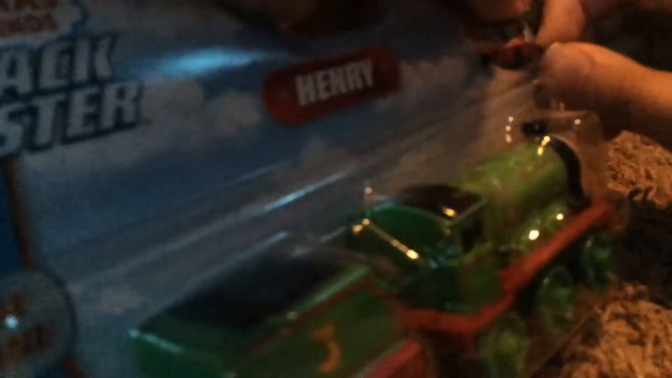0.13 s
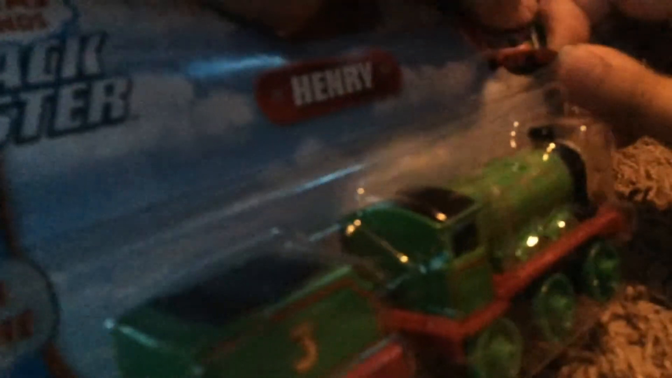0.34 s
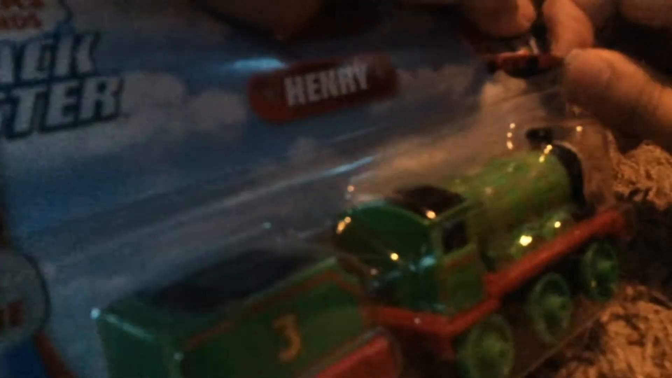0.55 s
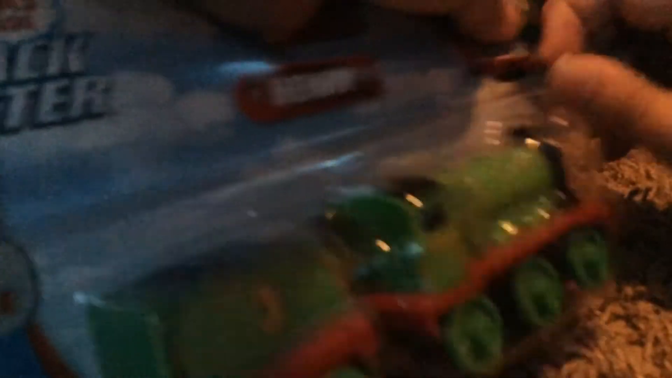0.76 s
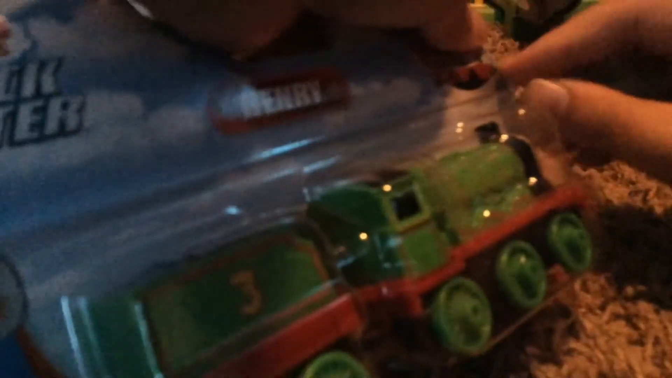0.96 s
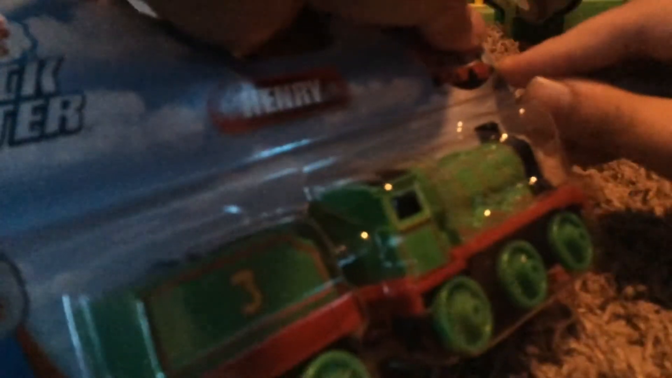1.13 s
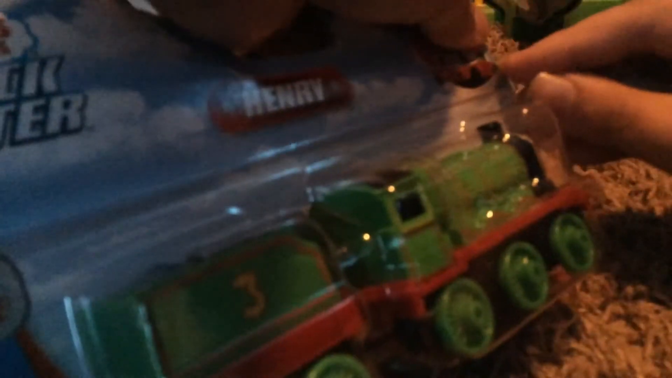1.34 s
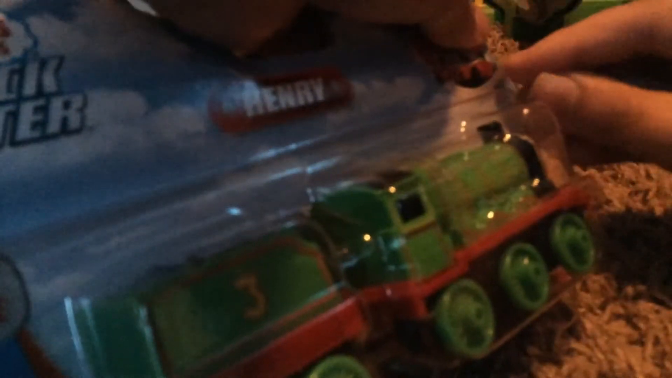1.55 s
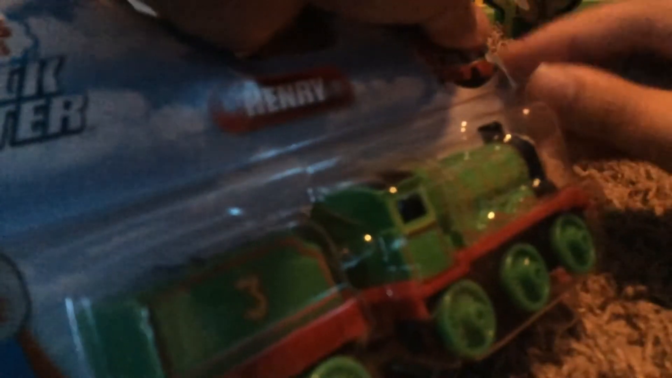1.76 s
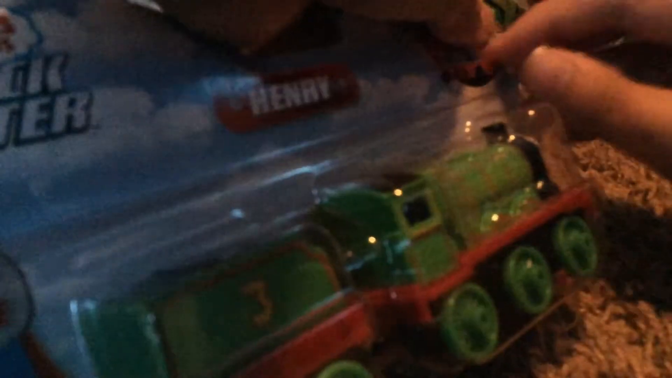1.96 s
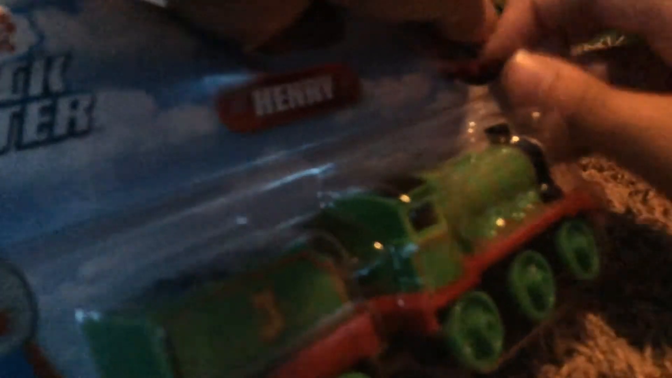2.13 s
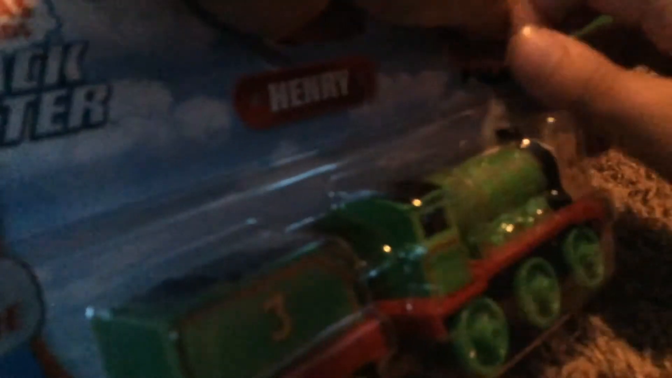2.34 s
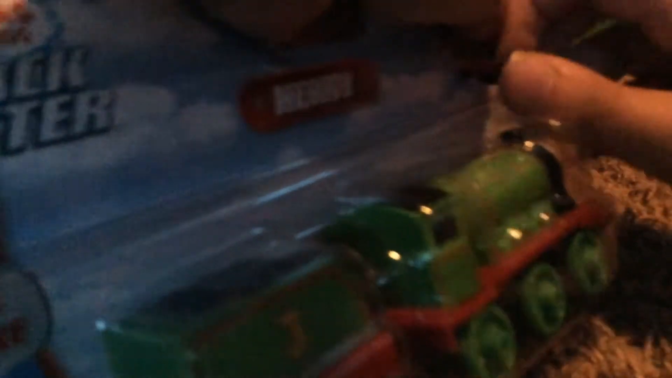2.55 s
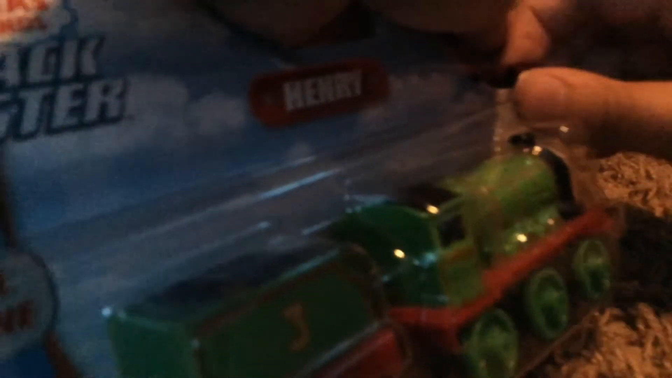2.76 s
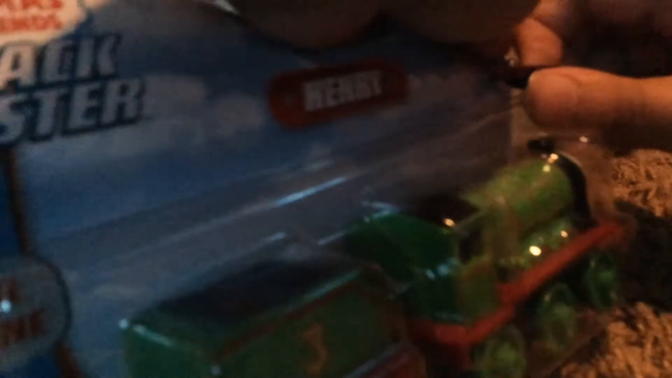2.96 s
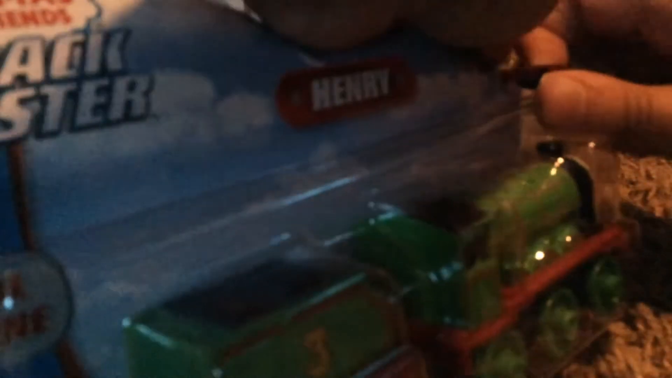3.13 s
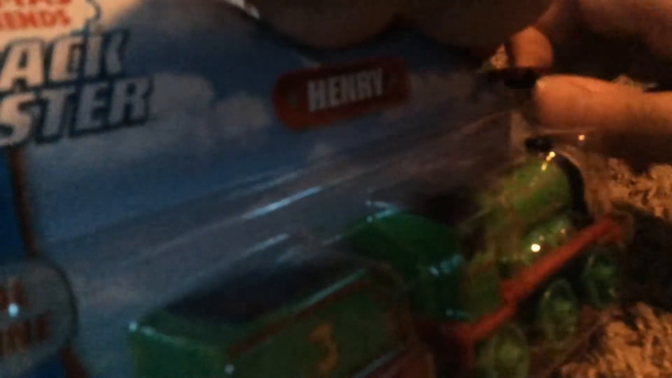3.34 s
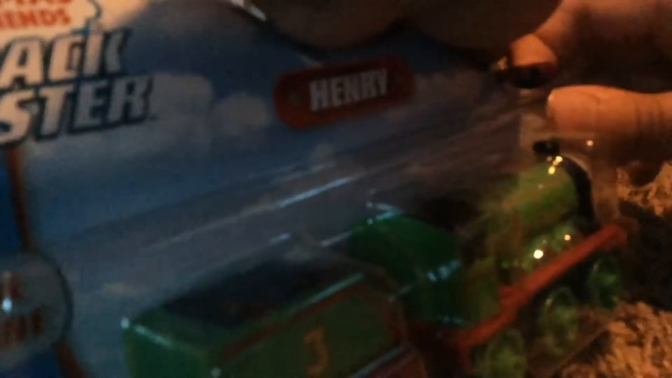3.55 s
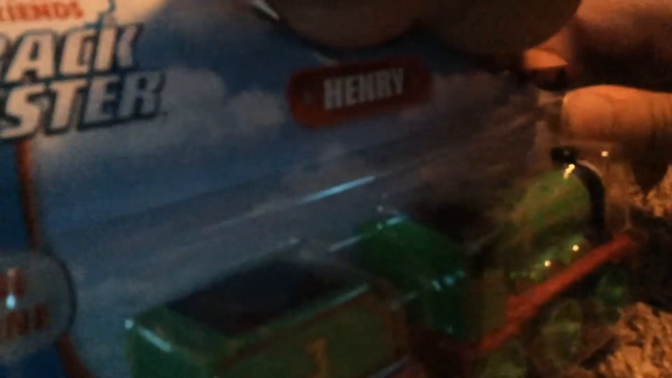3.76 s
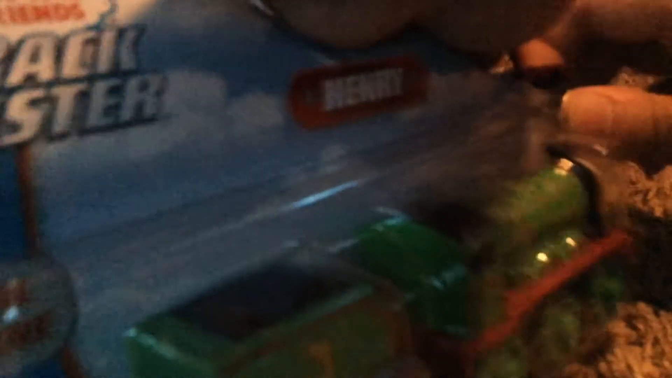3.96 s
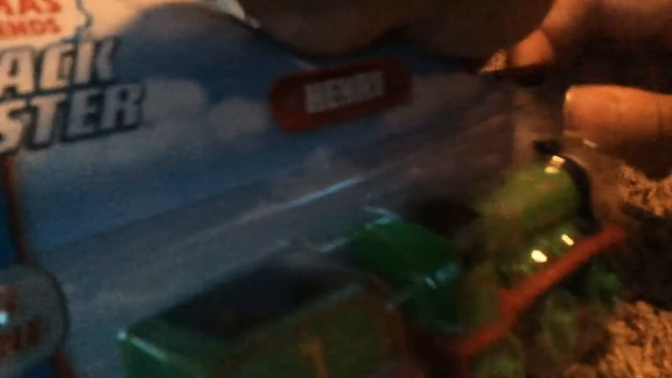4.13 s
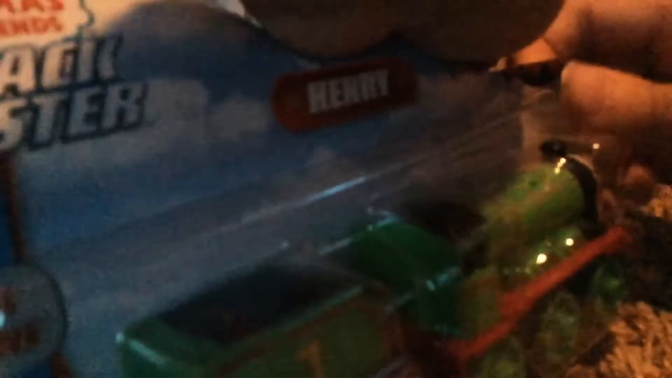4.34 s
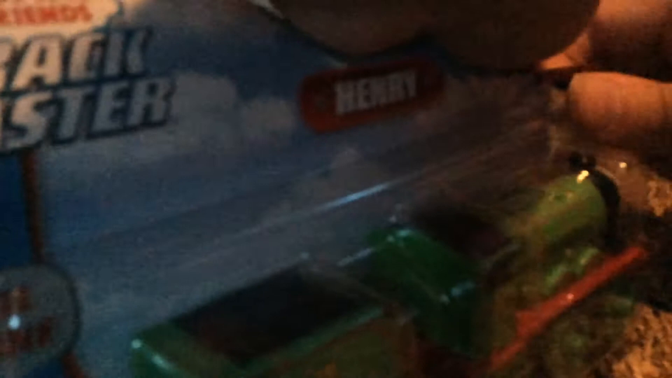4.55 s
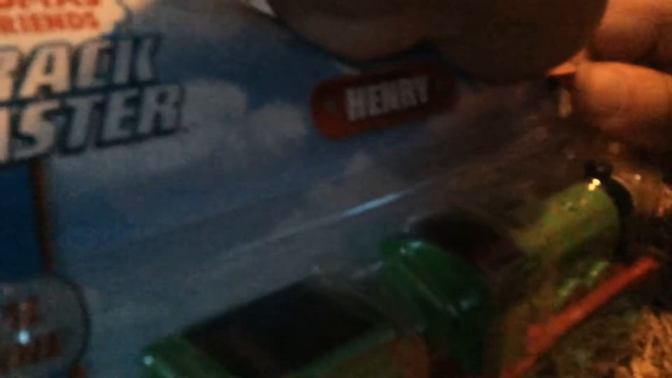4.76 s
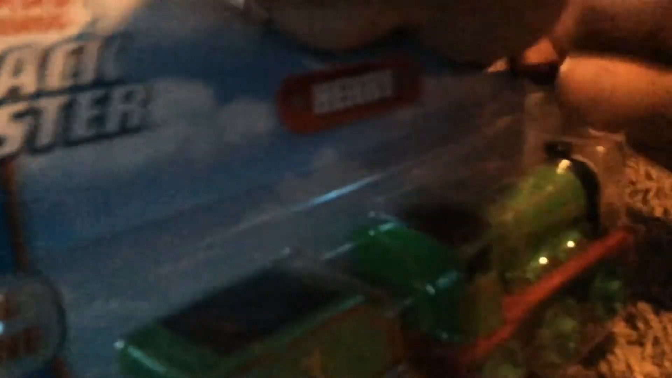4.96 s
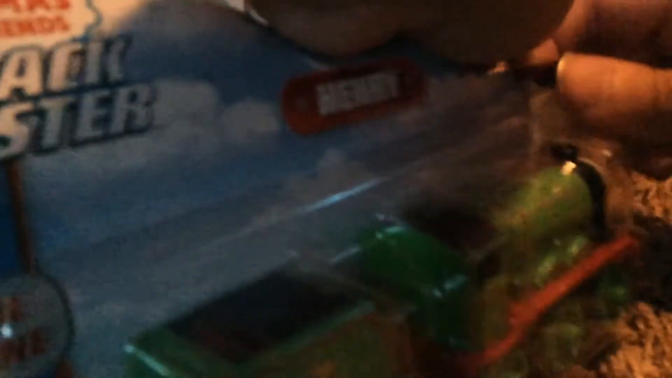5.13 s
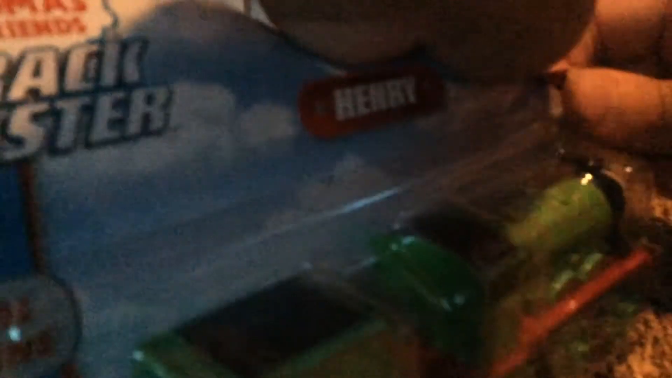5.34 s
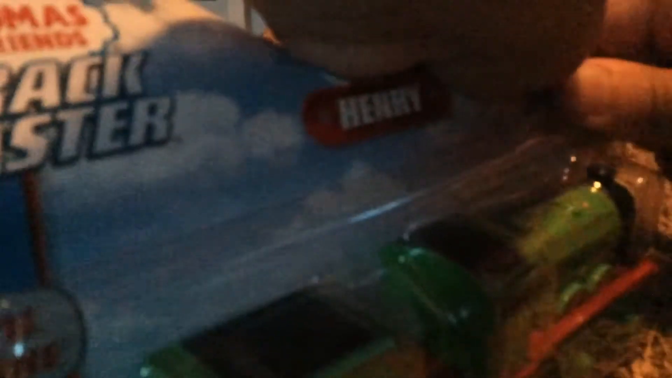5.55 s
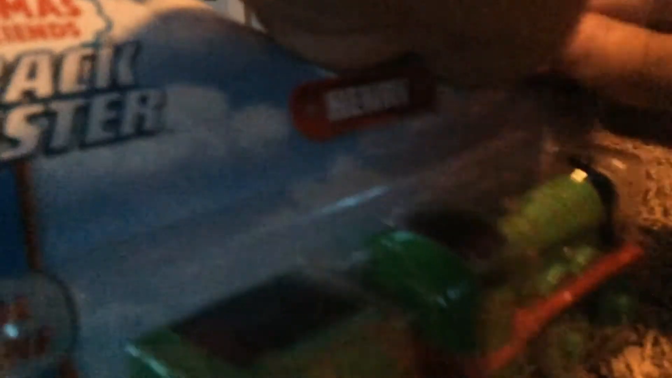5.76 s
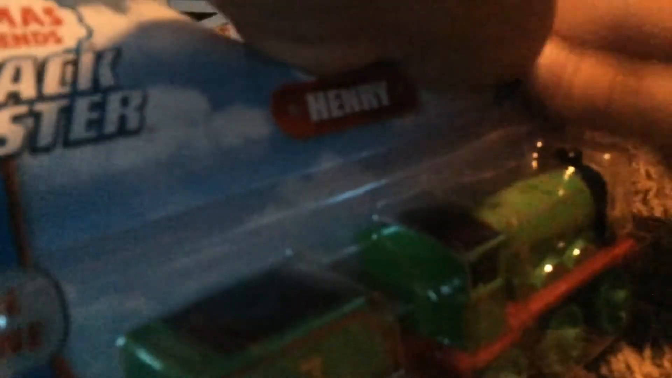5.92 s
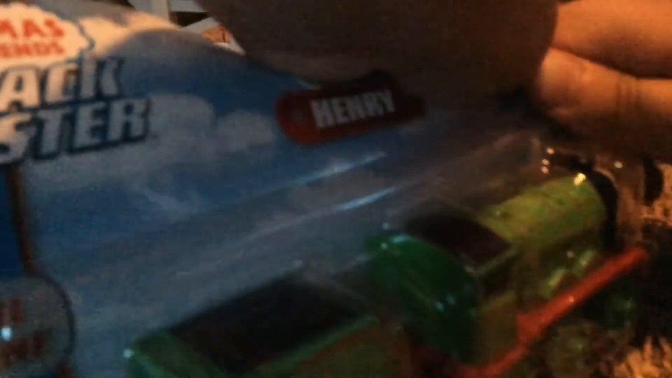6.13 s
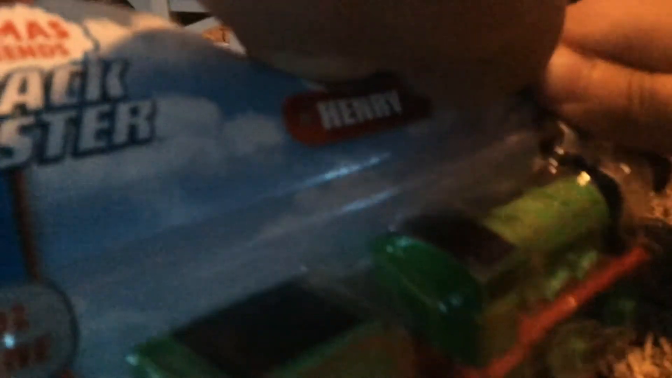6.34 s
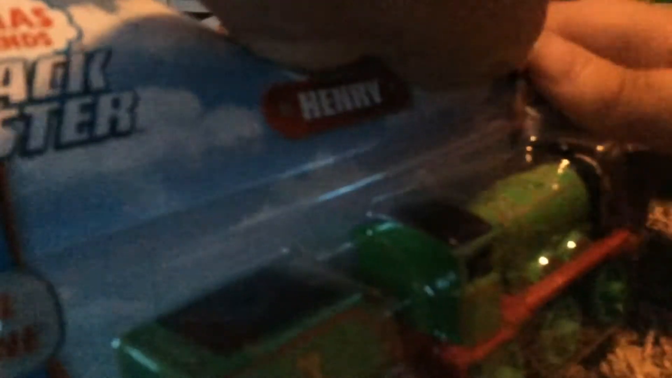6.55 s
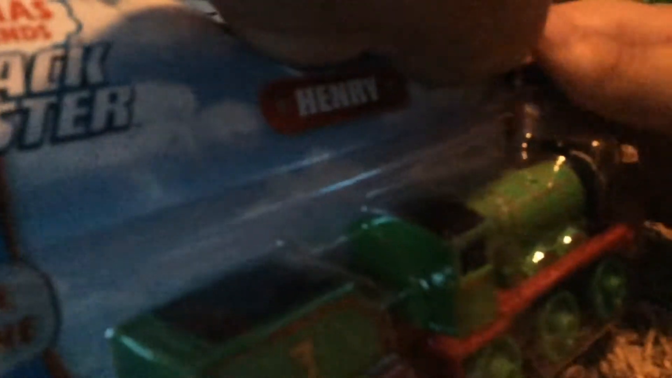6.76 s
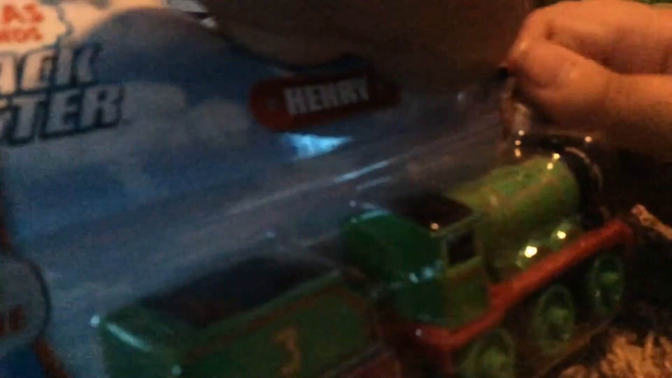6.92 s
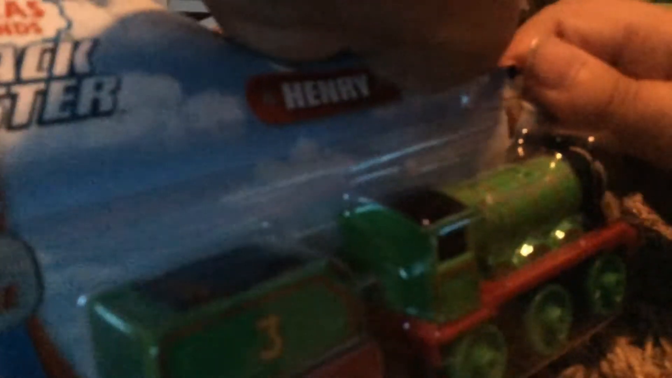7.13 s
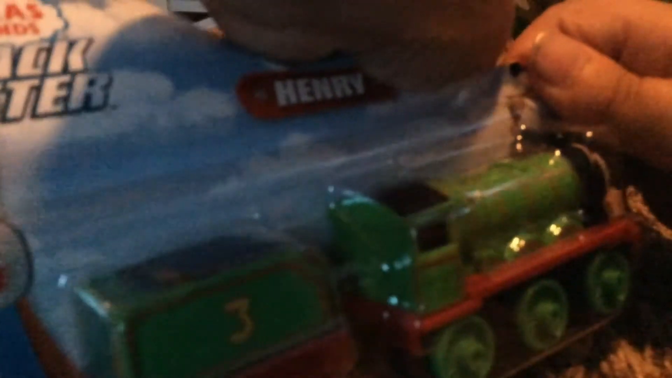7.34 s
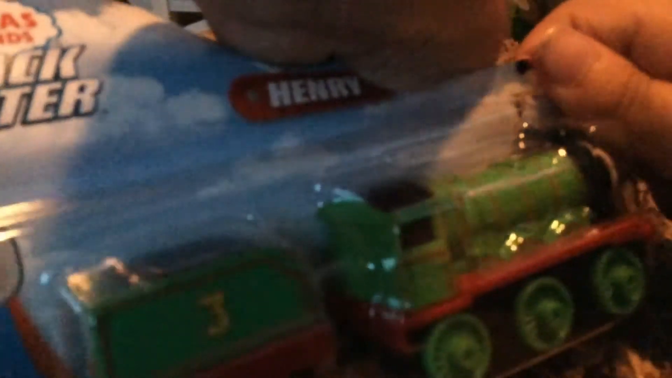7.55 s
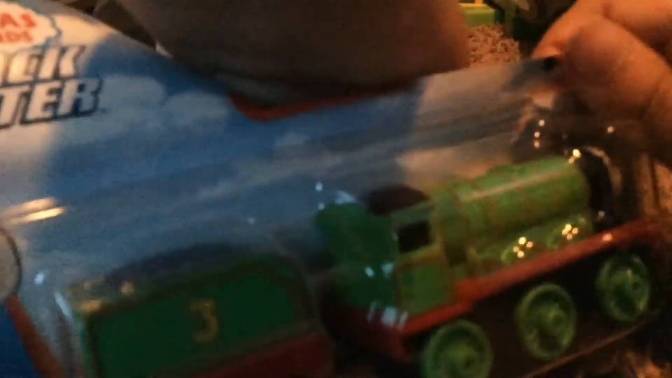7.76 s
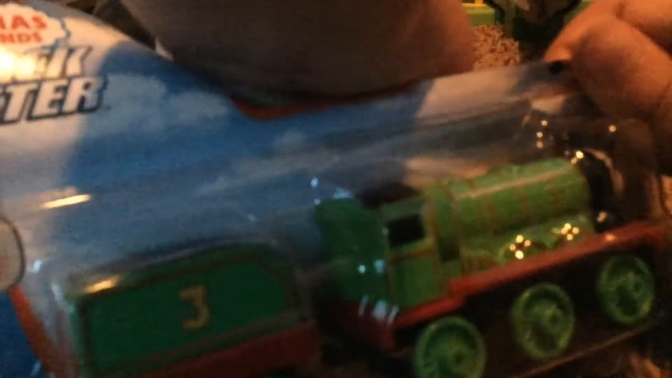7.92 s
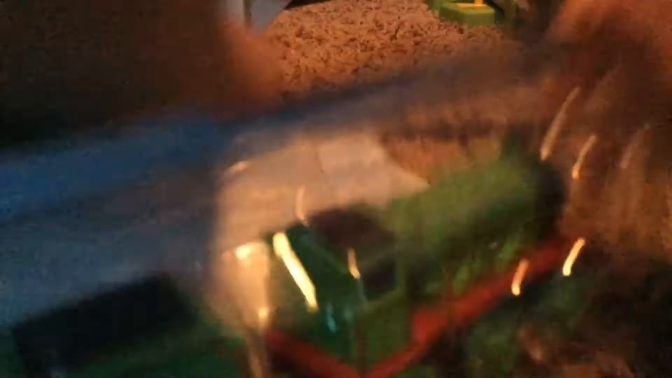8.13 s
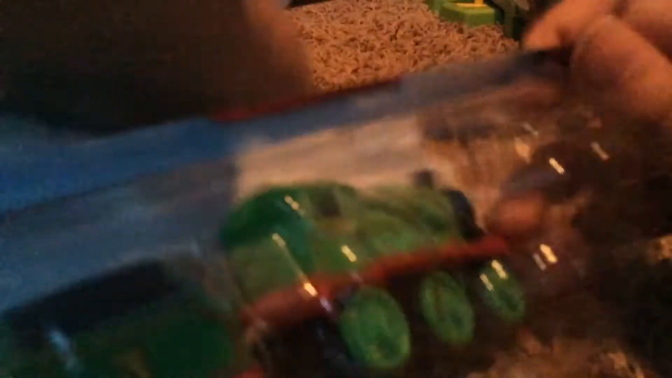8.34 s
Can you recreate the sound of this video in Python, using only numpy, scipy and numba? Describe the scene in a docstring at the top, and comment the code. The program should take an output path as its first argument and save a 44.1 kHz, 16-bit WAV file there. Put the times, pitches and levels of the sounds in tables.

```python
"""Fingers pry a clear plastic blister off its card, close by in a small carpeted room.
The sheet buckles in snaps: filtered noise bursts make the crack, decaying sines the ringing hollow shell.
Uneven runs of small cracks make creaks; filtered noise and random clicks make the hiss under each stroke.
Sines gliding in pitch squeak once, and near the end dense random clicks make the glued seam rip twice.
Under it all lies a quiet, low background of filtered noise."""
import sys
import numpy as np
from scipy import signal
from scipy.fft import rfft, irfft
from scipy.io import wavfile
from scipy.ndimage import uniform_filter1d
from numba import njit

SR = 44100
rng = np.random.default_rng(int(sys.argv[2]) if len(sys.argv) > 2 else 0)


def master_out(mix):
    """Clip the mix to full scale and print it as 16-bit PCM to the path in sys.argv[1]."""
    frames = np.transpose(np.atleast_2d(mix))
    ceiling = np.clip(frames, -1, 1)
    pcm = np.round(ceiling * 32767).astype(np.int16)
    wavfile.write(sys.argv[1], SR, pcm)


N = 369999
TIME = np.arange(N) / SR
RING = np.arange(2700) / SR  # time within one short blow [s]
BLOW_SAMPLES = SR / 100  # blow levels are rms over 10 ms

# ways the hollow shell rings, before the grip retunes them:
# (frequency [Hz], relative level [dB], time to fall 60 dB [s])
SHELL_MODES = [(422, -3, 0.031), (458, -9, 0.093), (508.5, 1.5, 0.057), (573.4, 3, 0.038),
               (617, -1.5, 0.049), (696, 0, 0.058), (759, 4, 0.026), (817.6, 0, 0.06), (1033, -8, 0.055),
               (1172, -8.5, .05), (1252, -11, 0.065), (1360, -2.5, 0.031)]
# ways the whole packet flexes, before the grip retunes them:
# (frequency [Hz], relative level [dB], time to fall 60 dB [s])
PACKET_MODES = [(58, -22.5, .09), (108, -9.5, 0.1), (136, -11.5, 0.051), (176, -13.5, 0.095),
                (232.5, -2, 0.035), (273, -7.5, 0.05), (342, 0.5, 0.056), (374, 1, 0.038)]
# spectrum of a cracking sheet: (frequency [Hz], relative level [dB])
CRACK_SPECTRUM = [(500, -24.5), (1100, 4), (1550, 8), (1900, 2), (2600, -2.5), (3300, 1), (5000, -2.5),
                  (6000, -4), (7500, -23), (12000, -48)]
# spectrum of a sharp, high tick: (frequency [Hz], relative level [dB])
TICK_SPECTRUM = [(2500, -36.5), (5000, -18.5), (6300, -2), (8500, 2), (11500, -0.5), (13500, -3),
                 (16000, -18.5)]
# a finger or the card slides over the plastic; levels are those halfway through the stroke:
# (start [s], end [s], scrape [dB], hiss [dB], shell [dB], swell from start to end [dB])
STROKES = [(0.018, 0.346, -61, -62.5, -58, 0.5), (0.403, 0.512, -61, -61.5, -61.5, 6),
           (0.66, 0.738, -77, -72.5, -74, -15), (0.795, 0.861, -65.5, -70, -58.5, 4),
           (0.973, 1.031, -70, -76, -66, 5), (1.404, 1.416, -68, -72, -62, -10),
           (1.822, 1.868, -68, -69, -57, -1), (1.998, 2.218, -69.5, -73.5, -64, 5.5),
           (2.509, 2.638, -66, -69, -58.5, -4), (2.721, 2.867, -70.5, -67, -70, 3),
           (2.897, 3, -58.5, -58.5, -60, 0), (3.029, 3.075, -53.5, -47, -43.5, 6),
           (3.153, 3.396, -69, -63.5, -61.5, -3), (3.476, 3.57, -60, -58, -53.5, -1.5),
           (3.593, 3.786, -63, -59, -60.5, 22.5), (3.891, 3.967, -55.5, -59.5, -60.5, 6),
           (4.047, 4.062, -45, -51, -44.5, 7), (4.204, 4.263, -48.5, -65, -45, -14),
           (4.332, 4.379, -70, -65, -56, 1), (4.458, 4.7, -64.5, -60, -53.5, 3),
           (4.691, 4.836, -70, -62, -67, 8), (4.91, 5.042, -61.5, -65, -59, 18.5),
           (5.114, 5.231, -56, -63, -46.5, -1.5), (5.307, 5.633, -61.5, -55.5, -57, 11.5),
           (5.677, 5.881, -58, -63.5, -53.5, 4.5), (5.939, 5.992, -44.5, -46.5, -36.5, -3.5),
           (6.048, 6.255, -55, -50, -59.5, 11.5), (6.324, 6.484, -47.5, -56.5, -46.5, -11),
           (6.538, 6.744, -67.5, -73, -67, -4), (6.896, 7.051, -66, -67.5, -61.5, -5),
           (7.09, 7.12, -45, -48.5, -48, -4), (7.156, 7.245, -65, -60.5, -63, 10),
           (7.283, 7.373, -54.5, -59, -54, -11.5), (7.378, 7.668, -53, -54, -53, 19),
           (7.849, 8.042, -50, -50.5, -56, 15), (8.141, 8.212, -41.5, -54, -51, -8),
           (8.348, 8.39, -45.5, -54, -54, 17)]


def undb(db):
    """Turn decibels into gain."""
    return 10 ** (np.asarray(db) / 20)


def unit(x):
    """Scale to rms 1."""
    return x / np.sqrt(np.mean(x ** 2) + 1e-18)


def blow(x, db):
    """Scale a short sound to the energy of 10 ms at this level."""
    return x * undb(db) * np.sqrt(BLOW_SAMPLES / (np.sum(x ** 2) + 1e-18))


def gains(rows):
    """Make one gain curve for each dB column of a table, silent outside its span."""
    s, *columns = np.transpose(rows)
    inside = (TIME >= s[0]) * (TIME <= s[-1])
    return [undb(np.interp(TIME, s, column)) * inside for column in columns]


def add(out, s, x):
    """Mix x into out at time s."""
    i = max(int(s * SR), 0)
    out[i:i + len(x)] += x[:max(N - i, 0)]


def through(x, response):
    """Pass x through an impulse response."""
    return signal.oaconvolve(x, response)[:len(x)]


def colour(points, size=512):
    """Make an impulse response with the given spectrum that starts at once (minimum phase)."""
    hz, db = np.transpose(points)
    f = np.maximum(np.arange(size // 2 + 1) * SR / size, 1)
    level_db = np.interp(np.log(f), np.log(hz), db)
    cepstrum = irfft(np.log(undb(level_db)))
    # fold the second half onto the first, so that nothing sounds before time zero
    cepstrum[1:size // 2] *= 2
    cepstrum[size // 2 + 1:] = 0
    return irfft(np.exp(rfft(cepstrum)))


def fade(t, t60):
    """Die away exponentially, by 60 dB in t60 seconds."""
    return np.exp(-np.log(1000) * t / t60)


@njit
def resonate(x, hz, q):
    """State-variable band-pass whose centre may move every sample."""
    y, band, low = np.empty(len(x)), 0., 0.
    for i in range(len(x)):
        g = np.tan(np.pi * min(hz[i] / SR, .45))
        v = (band + g * (x[i] - low)) / (1 + g * (g + 1 / q))
        band, low, y[i] = 2 * v - band, low + 2 * g * v, v / q
    return y


def facet(x, hz, q):
    """The small patch of plastic that flips lends a click its pitch."""
    return resonate(x, np.full(len(x), float(hz)), float(q))


def soften(x, hz):
    """Soft flesh pushes slowly, so the higher modes stay quiet."""
    return unit(signal.sosfilt(signal.butter(2, hz, fs=SR, output="sos"), x))


def unsteady(spread_db, size=600):
    """Gain of a grip that tightens and eases many times a second."""
    drift = uniform_filter1d(rng.standard_normal(N), size)
    drift = uniform_filter1d(drift, size)
    return unit(undb(spread_db * unit(drift)))


def ring(modes, detune, scatter_db):
    """One blow on a set of modes; the grip retunes them and the place of the blow weights them."""
    hz, db, t60 = np.transpose(modes)[:, :, None]
    tune, weight, side = rng.standard_normal((3, len(modes), 1))
    waves = np.sin(2 * np.pi * hz * (1 + detune * tune) * RING) * fade(RING, t60)
    motion = np.sum(np.sign(side) * undb(db + scatter_db * weight) * waves / hz, axis=0)
    return np.gradient(motion)  # a small shell radiates no steady pressure


def knock(modes, first_pass=0.36, spread_t60=0.061, rise=0.00024):
    """The first bending wave is the strongest; it arrives softly and then spreads over the shell."""
    strength = 1 + first_pass * fade(RING, spread_t60)
    onset = 1 - np.exp(-RING / rise)
    return ring(modes, detune=0.029, scatter_db=2.5) * strength * onset


def burst(front_t60, scatter_t60, scatter_db, rise=0.00072):
    """Noise with a sharp front, then bending waves that scatter about the sheet."""
    decay = fade(RING, front_t60) + undb(scatter_db) * fade(RING, scatter_t60)
    onset = 1 - np.exp(-RING / rise)
    return rng.standard_normal(len(RING)) * decay * onset


def grains(rate, spread_db):
    """Tiny slips at random moments; a positive spread makes a few much larger than the rest."""
    chance, out = rng.random(N), np.zeros(N)
    at = np.flatnonzero(chance < rate / SR)
    rarity = np.minimum(-np.log(chance[at] * SR / rate + 1e-18), 4)  # exponentially distributed
    out[at] = undb(spread_db * rarity) * (-1.) ** at
    return unit(out)


def rumble(modes, rate, spread_db, count=3):
    """A set of modes kept ringing by slips at several places."""
    total = np.zeros(N)
    for _ in range(count):
        total += through(grains(rate, spread_db), unit(ring(modes, detune=0.017, scatter_db=-0.5)))
    return unit(total)


def room_tone(level_db=-63):
    """A quiet, mostly low background made of steady filtered noise."""
    # (frequency [Hz], relative level [dB])
    tone_spectrum = [(20, -23.5), (45, -4.5), (70, -3), (120, -2.5), (200, -13), (400, -23), (800, -30),
                     (2000, -33.5), (5000, -37), (10000, -35), (13000, -38.5), (16000, -59.5)]
    return undb(level_db) * unit(through(rng.standard_normal(N), colour(tone_spectrum, size=4096)))


def room(x, wet_db=-13, build_s=0.0008, t60_s=.38):
    """The room returns a faint, bright tail."""
    # spectrum of the tail: (frequency [Hz], relative level [dB])
    echo_spectrum = [(60, -3.5), (200, 3.5), (600, -2), (1500, 0), (4000, -2), (9000, 0), (16000, 7)]
    t = TIME[:SR // 2]
    build_up = 1 - np.exp(-(t / build_s) ** 2)
    tail = through(rng.standard_normal(len(t)) * fade(t, t60_s) * build_up, colour(echo_spectrum))
    return x + undb(wet_db) * through(x, tail / np.sqrt(np.sum(tail ** 2)))


def bump(soft_hz=150):
    """A hand bumps the card softly, which moves only the lowest modes of the packet."""
    # (time [s], level [dB])
    bump_curve = [(2.33, -54), (2.352, -46.5), (2.39, -44.5), (2.42, -57), (2.5, -58)]
    return gains(bump_curve)[0] * soften(rumble(PACKET_MODES, rate=240, spread_db=-2), soft_hz)


def stroke_gains(press_db_per_s=478.5, lift_db_per_s=423):
    """Scrape, hiss and shell gains: each stroke takes hold, swells or eases steadily, and lets go."""
    out = np.zeros((3, N))
    for start, end, scrape, hiss, shell, swell in STROKES:
        near = slice(max(int((start - .1) * SR), 0), int((end + .1) * SR))
        t = TIME[near]
        shape = swell * (np.interp(t, [start, end], [0, 1]) - .5)
        shape -= press_db_per_s * np.maximum(start - t, 0)
        shape -= lift_db_per_s * np.maximum(t - end, 0)
        stroke = undb(np.array([[scrape], [hiss], [shell]]) + shape)
        out[:, near] = np.hypot(out[:, near], stroke)  # overlapping strokes add their power
    return out


def rubbing(flex_db=-7.0, grip_hz=570, grip_q=1.9):
    """Sliding contact: fine friction with coarser catches in it, heard from the sheet and from the shell."""
    # (frequency [Hz], relative level [dB])
    scrape_spectrum = [(700, -16), (1200, 3), (1550, 6), (1950, 2.5), (2700, -0.5), (3250, 4), (3900, 1.5),
                       (5000, -5), (6000, 3.5), (8000, -31)]
    # (frequency [Hz], relative level [dB])
    hiss_spectrum = [(3000, -42), (5200, 3), (6200, -3), (7100, -4.5), (8500, 1.5), (10000, -3),
                     (12300, -10), (13300, -15.5), (16000, -21.5)]
    scrape, hiss, shell = stroke_gains()
    catches = grains(rate=640, spread_db=3.0)
    friction = unit(catches + rng.standard_normal(N)) * unsteady(spread_db=2.0)
    sheet = scrape * unit(through(friction, colour(scrape_spectrum)))
    skin = hiss * unit(through(friction, colour(hiss_spectrum)))
    # the grip favours the middle modes of the shell
    hollow = unit(facet(rumble(SHELL_MODES, rate=55, spread_db=2.0), grip_hz, grip_q))
    flex = undb(flex_db) * rumble(PACKET_MODES, rate=90, spread_db=3)
    return sheet + skin + shell * (hollow + flex)


def squeak(waver=0.01417, strand_ratio=.9, strand_db=-11):
    """Very fast stick-slip whose pitch follows the speed of the fingertip; a second patch of skin sings lower."""
    # one curve per slide of the fingertips: (time [s], pitch before the waver [Hz], level [dB])
    slides = [
        [(5.36, 3720, -64), (5.385, 3817, -66), (5.4, 3830, -74)],
        [(5.39, 5175, -71), (5.45, 5330, -66), (5.51, 5196, -53), (5.55, 5430, -64)],
        [(5.54, 4900, -60), (5.58, 4770, -51), (5.61, 4524, -48), (5.635, 4434, -54), (5.67, 4430, -62)],
    ]
    out = np.zeros(N)
    wobble = 1 + waver * unit(uniform_filter1d(rng.standard_normal(N), size=60))
    for slide in slides:
        s, hz, db = np.transpose(slide)
        phase = 2 * np.pi * np.cumsum(np.interp(TIME, s, hz) * wobble) / SR
        upper = np.sin(phase) * unsteady(spread_db=2.0, size=350)
        lower = undb(strand_db) * np.sin(strand_ratio * phase) * unsteady(spread_db=6.0, size=350)
        out += gains(np.transpose([s, db]))[0] * unit(upper + lower)
    return out


def creaks(jitter=.08, scatter_db=1.5, slip_q=1.7, lag_s=0.00047, slip_tick_db=-15.5):
    """A finger sticks and slips in uneven runs, each slip a small crack and a dull knock on the shell."""
    # levels are those of a typical slip halfway through the run; the crack has a tick added:
    # (start [s], end [s], slips per second [1/s], crack [dB], swell from start to end [dB],
    #  facet pitch [Hz], shell [dB], thud [dB])
    creak_runs = [(3.761, 3.779, 120, -49.5, -8, 2380, -45, -60),
                  (3.9025, 3.924, 100, -40.5, -5.5, 4930, -46, -60),
                  (4.0798, 4.094, 150, -42.5, -3, 4150, -44, -48),
                  (4.1444, 4.205, 100, -39, 16, 4170, -36.5, -39),
                  (4.676, 4.725, 123, -55, 0, 2300, -50.5, -70),
                  (4.763, 4.818, 123, -53, -4, 2258, -47.5, -65),
                  (5.016, 5.068, 158, -56.5, 1, 2360, -50.5, -49.5),
                  (5.525, 5.616, 125, -50, 5.5, 2277, -45.5, -71),
                  (5.884, 5.92, 155, -34, 3, 3000, -31, -43.5),
                  (5.927, 5.962, 92, -37, -8, 3095, -35.5, -53),
                  (6.265, 6.304, 87, -53, -4, 2303, -47, -52)]
    out, crack_colour, tick_colour = np.zeros(N), colour(CRACK_SPECTRUM), colour(TICK_SPECTRUM)
    for start, end, rate, crack, swell, hz, shell, thud in creak_runs:
        draws = rng.standard_normal(size=(20, 2))
        for s, (late, size) in zip(np.arange(start, end, 1 / rate), draws):
            gain = undb(swell * ((s - start) / (end - start) - .5) + scatter_db * size)
            slip = burst(front_t60=0.0015, scatter_t60=0.011, scatter_db=-10)
            sheet = blow(facet(through(slip, crack_colour), hz, slip_q), crack)
            tick = blow(through(slip, tick_colour), crack + slip_tick_db)
            body = blow(knock(SHELL_MODES), shell) + blow(knock(PACKET_MODES), thud)
            at = s + jitter * late / rate
            add(out, at, gain * (sheet + tick))
            add(out, at + lag_s, gain * body)
    return out


def creases(q=3.8):
    """A run of minute buckles along the rim, falling in pitch as the crease lengthens."""
    # one curve per run, its pitch set by the free length of plastic: (time [s], pitch [Hz], level [dB])
    crease_runs = [
        [(2.71, 13900, -65), (2.77, 11000, -57), (2.81, 10000, -59)],
        [(3.6, 12700, -71.5), (3.71, 11700, -46.5), (3.76, 11000, -42), (3.82, 7930, -44.5), (3.87, 7150, -47)],
    ]
    out = np.zeros(N)
    for run in crease_runs:
        s, hz, db = np.transpose(run)
        crinkle = resonate(grains(rate=1500, spread_db=6.0), np.interp(TIME, s, hz), float(q))
        out += gains(np.transpose([s, db]))[0] * unit(crinkle)
    return out


def rips(fibre_db=1.0, hiss_db=-4.0, shell_db=-4.5, thud_db=-3.0, heave_hz=170):
    """Card fibres break by the thousand as the seam lets go, and the whole packet heaves."""
    # one curve per pull, before the offsets above: (time [s], fibre [dB], shell [dB], thud [dB])
    pulls = [
        [(7.655, -23, -45, -37), (7.66, -32, -32, -22.5), (7.675, -27, -30, -32), (7.7, -33.5, -37, -30),
         (7.722, -35.5, -31.5, -41), (7.745, -51, -43, -59)],
        [(8.03, -32, -41, -52), (8.045, -25.5, -39, -44), (8.07, -22.5, -27, -25), (8.087, -20.5, -27, -37),
         (8.1, -15, -25, -18), (8.122, -24.5, -8.5, -18), (8.135, -26.5, -22, -24), (8.155, -47, -33, -56)],
    ]
    fibre, shell, thud = np.sum([gains(pull) for pull in pulls], axis=0)
    breaks = grains(rate=5000, spread_db=3.0)
    tear = undb(fibre_db) * unit(through(breaks, colour(CRACK_SPECTRUM)))
    tear += undb(hiss_db) * unit(through(breaks, colour(TICK_SPECTRUM)))
    body = undb(shell_db) * shell * rumble(SHELL_MODES, rate=430, spread_db=3.0)
    flex = soften(rumble(PACKET_MODES, rate=460, spread_db=2.5), heave_hz)
    return fibre * tear + body + undb(thud_db) * thud * flex


def crinkles(count=10, per_s=18, level_db=1, spread_db=4.5, centre_hz=4800, octaves=0.86, thud_db=-5.5):
    """Small buckles at random moments of each stroke, as strong as the stroke is just then; rows for snaps()."""
    # level_db is above the stroke, thud_db relative to the shell; count is the most in one stroke
    rows = []
    for start, end, scrape, hiss, shell, swell in STROKES:
        waits, draws = rng.uniform(size=count), rng.uniform(-1.3, 1, (count, 3))
        moments = start + (np.arange(count) + waits) / per_s
        for s, (size, hollow, pitch) in zip(moments, draws):
            if s < end:
                db = level_db + spread_db * size + swell * ((s - start) / (end - start) - .5)
                body = shell + db + spread_db * hollow
                hz = centre_hz * 2 ** (octaves * pitch)
                rows.append((s, scrape + db, hz, hiss + db, body, body + thud_db))
    return rows


def snaps(rows, thud_db=-0.5, crack_q=1.84, tick_q=2.0, wall_db=-5.5, lag_s=0.00049):
    """Each buckle cracks, rings the walls, and reaches the shell a moment later."""
    # flat walls of the blister, before retuning:
    # (frequency [Hz], relative level [dB], time to fall 60 dB [s])
    wall_modes = [(1514, -1, 0.055), (1592, -8, 0.12), (1587, 4, 0.067), (2227, 6, 0.037), (2508, 4, 0.039),
                  (2920, 7, 0.025), (3130, 3.5, 0.05), (3330, -17, 0.0083)]
    out, crack_colour, tick_colour = np.zeros(N), colour(CRACK_SPECTRUM), colour(TICK_SPECTRUM)
    for s, crack, hz, tick, shell, thud in rows:
        crack_noise = burst(front_t60=0.0039, scatter_t60=0.024, scatter_db=-18.0)
        sheet = facet(through(crack_noise, crack_colour), hz, crack_q)
        tick_noise = burst(front_t60=0.0039, scatter_t60=0.022, scatter_db=-22.5)
        edge = facet(through(tick_noise, tick_colour), hz, tick_q)
        walls = undb(wall_db) * unit(knock(wall_modes))
        add(out, s, blow(unit(sheet) + walls, crack) + blow(edge, tick))
        body = blow(knock(SHELL_MODES), shell) + blow(knock(PACKET_MODES), thud + thud_db)
        add(out, s + lag_s, body)
    return out


def scene():
    """The packet in the room, over a quiet low background."""
    # the sheet buckles; the crack includes the walls, the thud is before its offset in snaps():
    # (time [s], crack [dB], facet pitch [Hz], tick [dB], shell [dB], thud [dB])
    buckles = [(0.477, -63, 8900, -69, -53, -64), (0.538, -53, 5900, -54, -44.5, -46.5),
               (0.646, -71, 9700, -56, -67, -67), (0.735, -61, 8300, -63, -58, -53.5),
               (0.825, -62, 4100, -61, -51.5, -56), (0.999, -55, 8100, -52.5, -43.5, -41.5),
               (1.023, -59, 2900, -73, -60, -70), (1.108, -48, 2900, -58, -53, -56),
               (1.2, -47.5, 3500, -53, -48.5, -51), (1.212, -52.5, 2900, -73, -60, -73),
               (1.299, -68, 2700, -85, -62.5, -60), (1.354, -58.5, 3800, -68, -70, -64),
               (1.417, -59.5, 2950, -72, -61, -63), (1.589, -54.5, 3500, -61.5, -54, -57.5),
               (1.807, -36.5, 3220, -51, -32, -42.5), (1.851, -52, 2770, -59, -47.5, -54),
               (2.017, -52.5, 6000, -57, -52, -52.5), (2.2, -35.5, 4860, -43, -42.5, -50),
               (2.368, -61.5, 2310, -75, -49.5, -70), (2.38, -59, 5500, -64, -46, -67),
               (2.582, -57, 2700, -56, -51, -67), (2.607, -50.5, 1900, -70, -58, -73),
               (2.628, -57, 5500, -56, -43, -38), (2.636, -53, 7800, -47.5, -44.5, -44),
               (2.712, -64, 9100, -53, -75, -73), (2.765, -52, 9600, -46, -61, -66),
               (2.793, -48, 9200, -48, -46, -44), (2.806, -48, 3180, -64, -38.5, -41),
               (2.9, -33, 10200, -31.5, -36.5, -45), (2.978, -49.5, 7500, -50, -42.5, -38),
               (2.992, -54, 11800, -45, -70, -66), (3.029, -36.5, 3800, -36.5, -33, -47),
               (3.055, -36.5, 3870, -39.5, -36.5, -39), (3.061, -37, 2700, -45, -39, -34.5),
               (3.157, -45, 3780, -51, -30.5, -40), (3.22, -34, 3400, -43, -28.5, -45),
               (3.246, -34, 3650, -40, -35, -41), (3.257, -34, 3500, -46, -28.5, -46),
               (3.327, -48.5, 2400, -67, -50.5, -54), (3.398, -54, 3300, -69, -40.5, -48),
               (3.405, -42, 4640, -50, -43, -42.5), (3.469, -49, 3200, -68, -42, -32),
               (3.476, -37.5, 3300, -53, -34.5, -37), (3.498, -33.5, 4900, -44, -38.5, -32.5),
               (3.507, -43, 8550, -38, -43, -43), (3.696, -53, 11000, -36, -56, -68),
               (3.768, -43.5, 9600, -45, -38.5, -62), (3.827, -39, 7100, -33.5, -40.5, -54),
               (3.884, -39.5, 3130, -52, -32, -56), (3.959, -28.5, 7040, -20, -36, -50),
               (4.2124, -29, 4800, -31, -29, -24.5), (4.284, -40, 3700, -53, -41, -40),
               (4.428, -58, 3996, -69, -41, -48), (4.446, -34.5, 2750, -46, -33, -40),
               (4.487, -55, 3770, -80, -50, -61), (4.515, -57, 2470, -69, -34, -33),
               (4.5234, -43.5, 5600, -48.5, -41, -37), (4.793, -47, 2300, -50.5, -44, -59),
               (4.923, -53.5, 3318, -56, -60, -70), (5.097, -39, 4400, -52, -38, -41),
               (5.113, -33, 4930, -36.5, -31.5, -44), (5.257, -44, 5840, -50, -47, -58),
               (5.314, -60, 8400, -50.5, -53, -59), (5.633, -47, 2470, -52, -39, -59),
               (5.702, -58, 6100, -55, -45.5, -42.5), (5.75, -66, 2705, -68, -41.5, -46.5),
               (6.057, -49, 5487, -48.5, -65, -63), (6.175, -37, 5790, -36.5, -49.5, -51.5),
               (6.224, -44.5, 5860, -51.5, -57, -63.5), (6.308, -41, 8000, -42, -42, -44.5),
               (6.322, -16, 2740, -24.5, -16.5, -21.5), (6.478, -43, 2567, -57, -40, -52),
               (6.572, -55, 2300, -70, -46.5, -58), (6.624, -62.5, 3130, -70.5, -52.5, -47.5),
               (6.893, -57, 3930, -71, -52, -60), (7.005, -59, 2930, -66, -47.5, -41.5),
               (7.11, -48, 5300, -61, -42, -47), (7.247, -59, 9440, -56, -72, -73),
               (7.273, -47.5, 2400, -60, -41.5, -65), (7.436, -62, 2800, -66, -43.5, -55),
               (7.658, -27.5, 7120, -37, -54, -33.5), (7.66, -23.5, 5000, -24, -32, -33),
               (7.688, -32, 4230, -36, -35, -34), (7.712, -35.5, 3700, -50, -31.5, -39),
               (7.771, -46, 4180, -64, -44, -46), (8.042, -29, 3490, -40, -29, -29.5),
               (8.049, -17.5, 5100, -31, -25, -32), (8.059, -17, 4700, -25, -17, -36),
               (8.077, -20, 4080, -24, -21, -32), (8.095, -26, 3590, -29, -14, -16),
               (8.105, -21, 2700, -30, -16, -23), (8.116, -16.5, 2680, -24, -34, -16.5),
               (8.122, -20, 3100, -34, -19, -26), (8.201, -36, 2480, -44.5, -39, -41),
               (8.288, -44.5, 5190, -51, -45, -41.5), (8.359, -32.5, 4770, -38, -44, -44)]
    background = room_tone()
    sliding = rubbing() + squeak() + bump()
    breaking = rips() + creases() + snaps(list(buckles) + crinkles()) + creaks()
    return (room(sliding + breaking) + background)[None]


def record(dry, low_cut_hz=36, top_hz=15900):
    """The recorder thins the deepest bass, clips at full scale and cuts the top."""
    thinned = signal.sosfilt(signal.butter(2, low_cut_hz, "high", fs=SR, output="sos"), dry)
    clipped = np.clip(thinned, -1, 1)
    return signal.sosfilt(signal.ellip(8, .2, 80, top_hz, fs=SR, output="sos"), clipped)


dry = scene()
out = record(dry)
master_out(out)
```